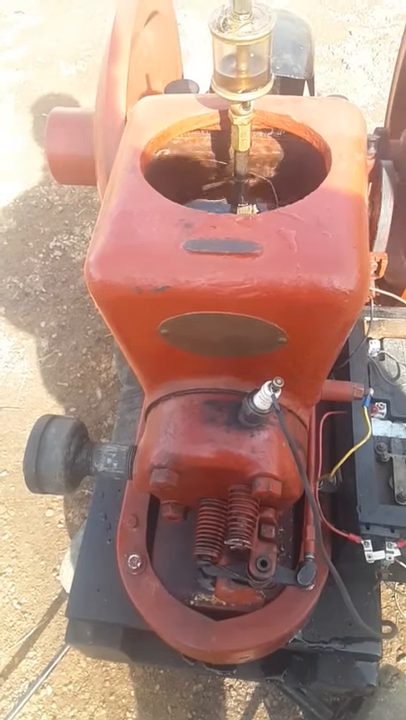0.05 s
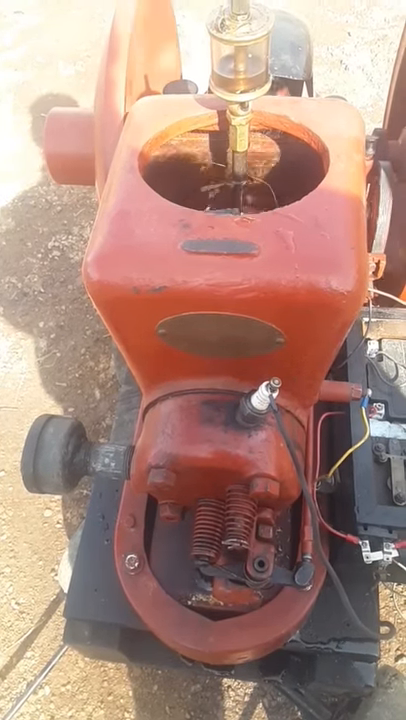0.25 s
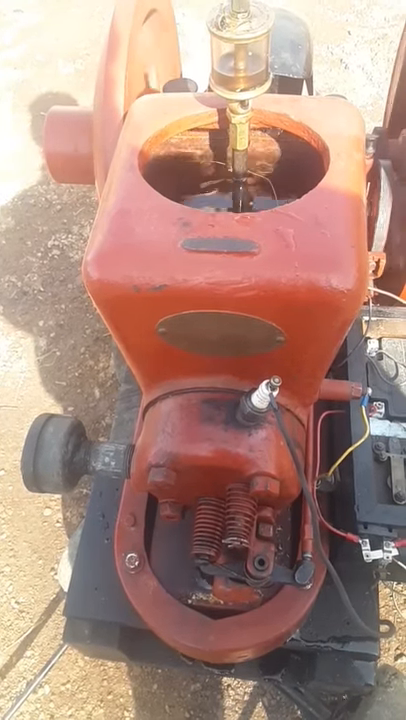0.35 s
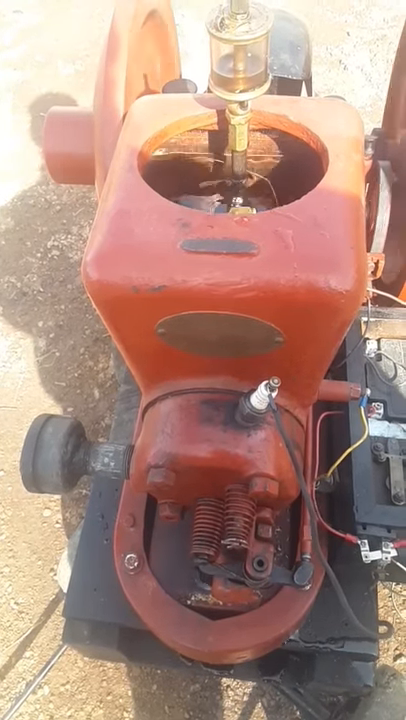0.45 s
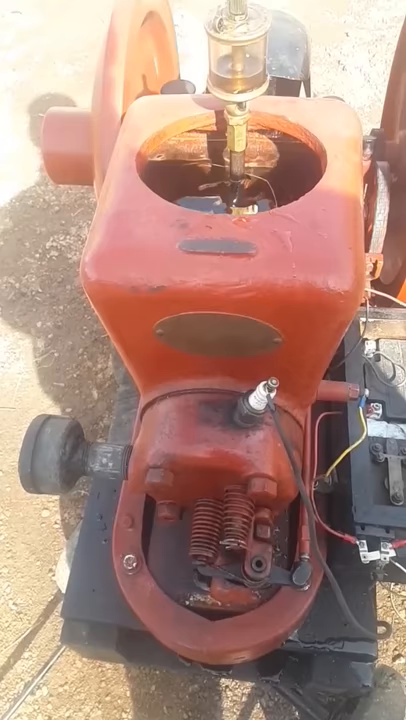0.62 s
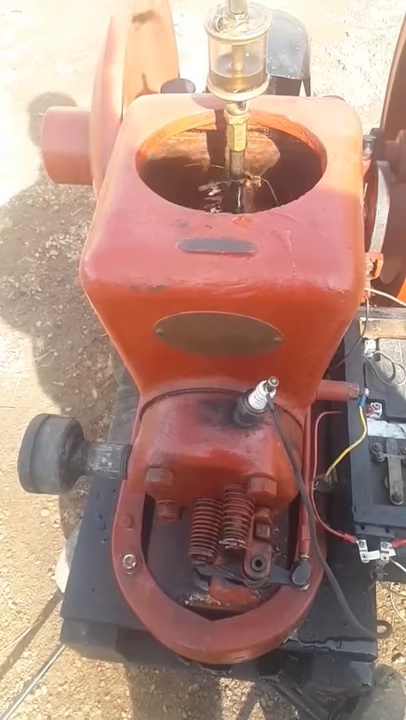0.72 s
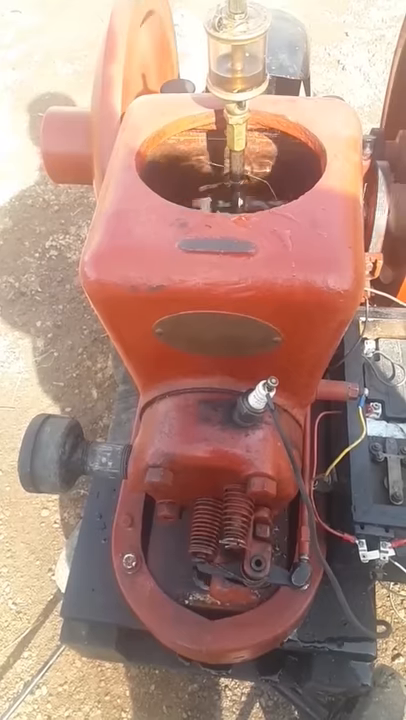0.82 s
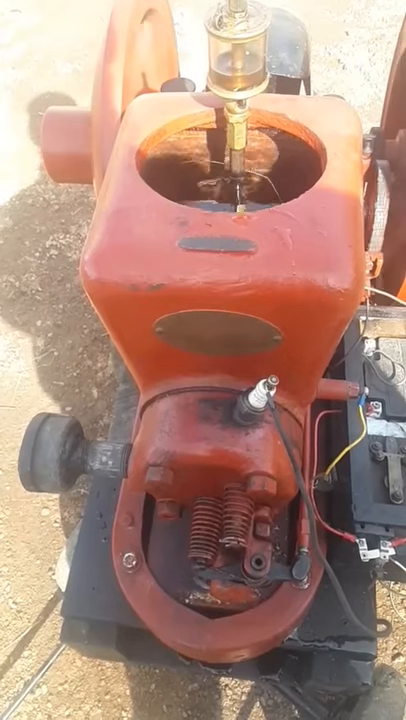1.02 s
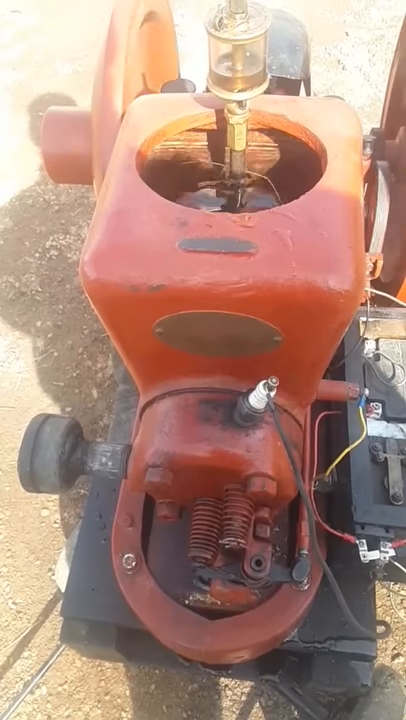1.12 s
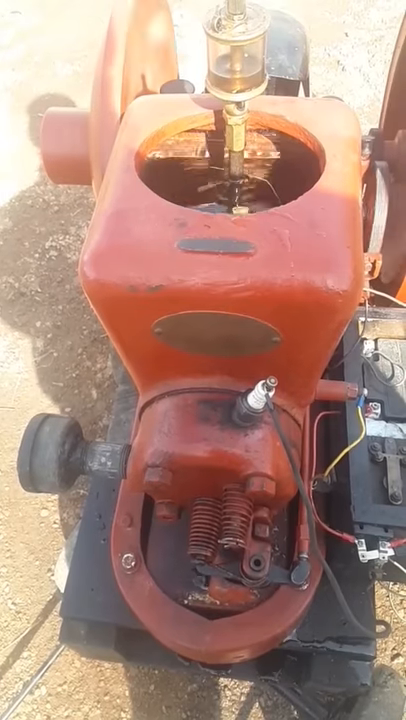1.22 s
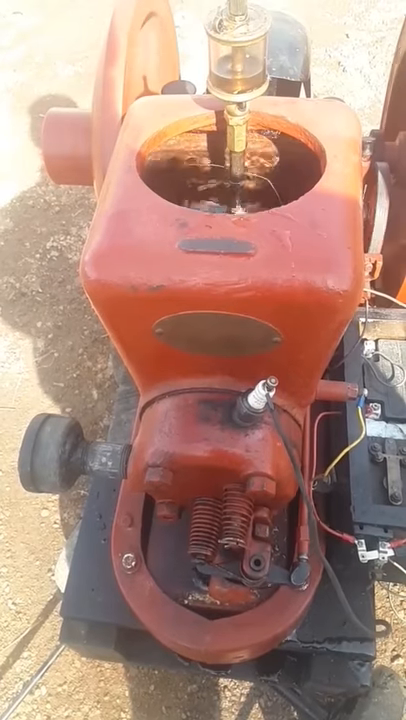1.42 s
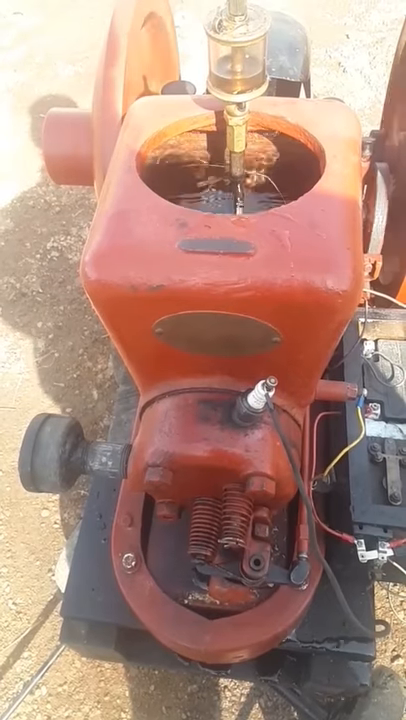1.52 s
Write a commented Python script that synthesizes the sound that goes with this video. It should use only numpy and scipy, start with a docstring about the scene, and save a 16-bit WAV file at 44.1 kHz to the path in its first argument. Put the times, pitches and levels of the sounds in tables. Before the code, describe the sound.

Heard from just above it outdoors, an old single-cylinder engine idles with uneven metallic clacks over a low rumble. A quick sputtering intake leads to one strong firing burst and a puff of exhaust before the coasting clatter resumes.

```python
"""Hit-and-miss engine idling.

An old petrol engine outdoors, heard from just above its cylinder head. It coasts with grinding,
rattling gears and a clacking push rod, sucks in a charge through its fluttering intake valve,
fires with a knock, barks from the exhaust and coasts on. Knocks and gear teeth ring the iron casting."""
import sys
import numpy as np
from scipy import signal
from scipy.fft import rfft, irfft
from scipy.io import wavfile

SR = 44100
rng = np.random.default_rng(int(sys.argv[2]) if len(sys.argv) > 2 else 0)


def output_pcm(signal):
    """Save a mono or channel-first signal as 16-bit PCM at the path in sys.argv[1].

    Samples are clipped to [-1, 1] before scaling.
    """
    pcm = np.clip(np.atleast_2d(signal).T, -1, 1) * 32767
    wavfile.write(sys.argv[1], SR, np.round(pcm).astype(np.int16))


N = 68355
T = np.arange(N) / SR

# gear grind and cart rumble: time_s, grind_db, rumble_db
RUNNING_LEVELS = [(0, -32, -40), (.1, -34.5, -37), (.27, -33, -43), (.36, -29, -31), (.42, -36, -45),
                  (.62, -30, -33), (.66, -34, -38), (.71, -29.5, -37), (.81, -37, -40), (.86, -29, -31),
                  (1.0, -31, -27), (1.25, -31, -35), (1.34, -30, -29), (1.4, -36.5, -42)]
# gear, bearing and combustion knocks: start_s, level_db, decay_s
KNOCKS = [(.0605, -19.5, .003), (.0665, -22, .005), (.118, -28, .018), (.1465, -23.5, .006),
          (.209, -26, .01), (.243, -20, .007), (.267, -22, .02), (.315, -23, .01), (.357, -23, .014),
          (.421, -25, .02), (.474, -24.5, .012), (.521, -26, .01), (.5685, -15.5, .005), (.598, -25, .018),
          (.682, -27, .022), (.7155, -19, .006), (.766, -26, .014), (.8315, -13, .0065), (.902, -19, .003),
          (.93, -21, .025), (1.107, -18.5, .01), (1.251, -23, .012), (1.28, -23, .008), (1.315, -25, .02),
          (1.4222, -28, .005)]
# push rod and latch: start_s, tick_db, thud_db
CLACKS = [(.1685, -27.5, -24), (.2245, -34, -23), (.4895, -27, -22), (.5485, -31, -27), (.7143, -33, -34),
          (.828, -28, -22), (.911, -33, -34), (1.1285, -28, -29), (1.4212, -34, -28), (1.4681, -40, -37)]
# intake valve closures: time_s, thump_db, reopening_hiss_db
VALVE_SLAPS = [(.9245, -21, -14.5), (.9465, -19, -12.5), (.9700, -9.5, -13), (.9918, -6.5, -19),
               (1.0102, -7, -36)]
# cylinder jolts, firing noises, exhaust puffs: start_s, level_db, rise_s, hold_s, decay_s
JOLTS = [(.9015, -17, .001, .004, .005), (1.1055, -14, .004, .009, .004)]
FIRING_HISS = (1.083, -24.5, .012, .002, .009)
FIRING_SCRAPE = (1.094, -25, .003, .02, .006)
BARK = (1.1615, -7, .004, .008, .004)
BLOWDOWN = [(1.175, -22, .003, .055, .025), (1.205, -17.5, .008, .005, .01)]
BOOM = (1.1785, -6.5, .008, .016, .0065)
# brief dropout: time_s, gain_db
DROPOUT = [(.008, 0), (.024, -60), (.039, -60), (.042, -10), (.048, 0)]

# iron casting: pitch_hz, relative_db, t60_s
IRON_MODES = [(460, -20, .15), (965, -14, .12), (1420, -8, .05), (1800, -2, .035), (1866, 0, .07),
              (2050, -4, .06), (2335, -11, .06), (2555, -12, .04), (2880, -17, .1), (3430, -16, .07),
              (3965, -16, .08), (5160, -23, .07)]
# valve springs, cylinder, exhaust port: pitch_hz, relative_db
SPRING_MODES = [(3980, 0), (5110, -1), (6160, -7)]
CYLINDER_MODES = [(650, -10), (1873, 4), (2525, -8)]
PORT_MODES = [(2180, -5), (2515, -1), (2676, 0), (2943, 0), (3450, -6), (4890, -6)]

# source spectra: frequency_hz, relative_db
GRIND_SPECTRUM = [(150, -14), (280, -3), (380, -9), (470, -2), (700, 0), (1050, -6), (1400, -2), (1950, -1),
                  (3100, -14), (4000, -14), (7000, -32), (8500, -44), (17000, -45)]
RUMBLE_SPECTRUM = [(20, -32), (75, -2), (170, 0), (280, -1), (380, -18), (3000, -60)]
KNOCK_SPECTRUM = [(100, -23), (1000, -12), (1680, -8), (1900, 2), (2100, -3), (2400, -5), (3100, -16),
                  (4000, -17), (6300, -34), (8200, -53), (16000, -56)]
TICK_SPECTRUM = [(300, -10), (1500, -4), (5200, 0), (6800, -8), (8300, -25), (17000, -31)]
THUD_SPECTRUM = [(60, -34), (270, 5), (380, -9), (470, 3), (600, -3), (720, -1), (5000, -52)]
INTAKE_SPECTRUM = [(300, -22), (1600, -9), (2100, -2), (3400, -8), (3800, 3), (4400, -3), (6300, -2),
                   (7400, -9), (8250, -23), (9900, -9), (17000, -13)]
BARK_SPECTRUM = [(330, -2), (600, -9), (1150, 0), (1500, -7), (2000, 6), (2700, -4), (5000, -8),
                 (6500, -15), (8100, -32), (10400, -18), (17000, -21)]
BLOWDOWN_SPECTRUM = [(200, -9), (1500, -5), (3500, -1), (6400, -13), (7900, -35), (10500, -23),
                     (17000, -26)]


def amp(level_db):
    """Decibels to gain."""
    return 10 ** (np.asarray(level_db) / 20)


def unit_rms(x):
    """Scale to rms 1."""
    return x / np.sqrt(np.mean(x ** 2))


def noise():
    """White noise."""
    return rng.standard_normal(N)


def convolve(x, response):
    """Pass x through a response scaled to unit energy."""
    return signal.fftconvolve(x, response / np.linalg.norm(response))[:N]


def colour(x, spectrum, taps=4096):
    """Minimum-phase filter with the shape of a spectrum."""
    frequency_hz, relative_db = np.array(spectrum).T
    grid_hz = np.maximum(np.arange(taps // 2 + 1) * SR / taps, 1)
    grid_db = np.interp(np.log(grid_hz), np.log(frequency_hz), relative_db)
    cepstrum = irfft(np.log(amp(grid_db)))
    cepstrum[1:taps // 2] *= 2
    cepstrum[taps // 2 + 1:] = 0
    return convolve(x, irfft(np.exp(rfft(cepstrum))))


def ring(x, modes):
    """Drive damped modes of alternating sign with x."""
    age_s = T[:N // 4]
    response = np.zeros_like(age_s)
    for k, (pitch_hz, relative_db, t60_s) in enumerate(modes):
        envelope = amp(relative_db) / np.sqrt(t60_s) * np.exp(-np.log(1000) * age_s / t60_s)
        response += (-1) ** k * envelope * np.sin(2 * np.pi * pitch_hz * age_s)
    return convolve(x, response)


def swell(start_s, level_db, rise_s, hold_s, decay_s):
    """Linear rise, hold, exponential decay."""
    age_s = T - start_s
    attack = np.clip(age_s / rise_s, 0, 1)
    return amp(level_db) * attack * np.exp(-np.maximum(age_s - rise_s - hold_s, 0) / decay_s)


def wavelet(centre_s, level_db, pitch_hz, width_s):
    """One short swing of air pressure."""
    age_s = T - centre_s
    return amp(level_db) * np.sin(2 * np.pi * pitch_hz * age_s) * np.exp(-(age_s / width_s) ** 2 / 2)


def contacts(rate_per_s=1100, spread_db=2.4):
    """Dense small metal contacts of uneven size."""
    hits = rng.random(N) < rate_per_s / SR
    return unit_rms(hits * np.sign(noise()) * amp(spread_db * noise()))


def gears_and_cart(ring_db=-4.5):
    """Gear teeth grind without pause and ring the casting; the cart rumbles."""
    time_s, grind_db, rumble_db = np.array(RUNNING_LEVELS).T
    teeth = unit_rms(contacts() + .7 * noise()) * amp(np.interp(T, time_s, grind_db))
    rumble = unit_rms(colour(noise(), RUMBLE_SPECTRUM)) * amp(np.interp(T, time_s, rumble_db))
    return colour(teeth, GRIND_SPECTRUM) + amp(ring_db) * ring(teeth, IRON_MODES) + rumble


def knocks(strike_db=17, ring_db=-.5):
    """Slack gears, bearings and combustion strike the casting once, then rattle on."""
    force = np.zeros(N)
    for start_s, level_db, decay_s in KNOCKS:
        envelope = swell(start_s, level_db, rise_s=.22 * decay_s, hold_s=0, decay_s=decay_s)
        rattle = envelope * (contacts() + noise())
        force += rattle * np.linalg.norm(envelope) / np.linalg.norm(rattle)
        force[int(start_s * SR)] += amp(level_db + strike_db)
    return colour(force, KNOCK_SPECTRUM) + amp(ring_db) * ring(force, IRON_MODES)


def spring_twang(start_s, level_db, top_hz=5900, fall_s=.011):
    """Treble runs along the coils first, so the pitch falls."""
    cycles = top_hz * fall_s * np.exp(-np.maximum(T - start_s, 0) / fall_s)
    return swell(start_s, level_db, rise_s=.0014, hold_s=0, decay_s=.007) * np.sin(2 * np.pi * cycles)


def push_rod(spring_db=-5, spring_t60_s=.03, twang_db=-4, thud_lag_s=.002):
    """The rod ticks, the valve springs ring and twang, the frame answers with a thud."""
    tick_envelope, thud_envelope, twangs = np.zeros((3, N))
    for start_s, tick_db, thud_db in CLACKS:
        tick_envelope += swell(start_s, tick_db, rise_s=.0014, hold_s=.0014, decay_s=.0042)
        thud_envelope += swell(start_s + thud_lag_s, thud_db, rise_s=.005, hold_s=0, decay_s=.024)
        twangs += spring_twang(start_s, tick_db + twang_db)
    ticks = tick_envelope * noise()
    springs = amp(spring_db) * ring(ticks, [(hz, db, spring_t60_s) for hz, db in SPRING_MODES])
    thuds = colour(thud_envelope * noise(), THUD_SPECTRUM)
    return colour(ticks, TICK_SPECTRUM) + springs + twangs + thuds


def cylinder_pings():
    """Hard jolts ping the cylinder before the intake and at combustion."""
    tone = sum(amp(db) * np.sin(2 * np.pi * hz * T) for hz, db in CYLINDER_MODES)
    return sum(swell(*jolt) for jolt in JOLTS) * tone


def intake(reopen_lag_s=.002, pipe_lag_s=.007, pipe_hz=290):
    """Air hisses through the fluttering valve; each closure thumps, the pipe rings after the last."""
    flow, thumps = np.zeros((2, N))
    for shut_s, thump_db, hiss_db in VALVE_SLAPS:
        flow += swell(shut_s + reopen_lag_s, hiss_db, rise_s=.003, hold_s=.0142, decay_s=.003)
        thumps += wavelet(shut_s, thump_db, pitch_hz=260, width_s=.0019)
    pipe_start_s = VALVE_SLAPS[-1][0] + pipe_lag_s
    pipe_envelope = swell(pipe_start_s, level_db=-16.5, rise_s=.004, hold_s=0, decay_s=.016)
    pipe = pipe_envelope * np.sin(2 * np.pi * pipe_hz * (T - pipe_start_s))
    return colour(flow * noise(), INTAKE_SPECTRUM) + thumps + pipe


def firing():
    """A short hiss and a metallic scrape as the charge fires."""
    hiss = colour(swell(*FIRING_HISS) * noise(), INTAKE_SPECTRUM)
    scrape = colour(swell(*FIRING_SCRAPE) * noise(), TICK_SPECTRUM)
    return hiss + scrape


def exhaust(boom_start_hz=125, glide_hz_per_s=2800, port_db=-3.5, port_t60_s=.08):
    """The valve barks open, the pipe booms upward in pitch, spent gas hisses out and rings the port."""
    pressure_front = -wavelet(centre_s=1.1607, level_db=-11, pitch_hz=320, width_s=.0013)
    bark = swell(*BARK) * noise()
    gas = sum(swell(*puff) for puff in BLOWDOWN) * noise()
    age_s = T - BOOM[0]
    boom_cycles = boom_start_hz * age_s + glide_hz_per_s * age_s ** 2 / 2
    boom = swell(*BOOM) * np.sin(2 * np.pi * boom_cycles)
    port = amp(port_db) * ring(gas + .5 * bark, [(hz, db, port_t60_s) for hz, db in PORT_MODES])
    return pressure_front + colour(bark, BARK_SPECTRUM) + colour(gas, BLOWDOWN_SPECTRUM) + boom + port


def scene(scatter_db=-21):
    """The engine with a faint outdoor scatter, mono."""
    engine = gears_and_cart() + knocks() + push_rod() + cylinder_pings() + intake() + firing() + exhaust()
    yard_response = noise() * swell(start_s=.004, level_db=0, rise_s=.003, hold_s=0, decay_s=.022)
    return (engine + amp(scatter_db) * convolve(engine, yard_response))[None]


def record(dry, low_cut_hz=48, high_cut_hz=17000):
    """The microphone thins the deep bass; the sound drops out once, peaks clip, the top is cut."""
    thinned = signal.sosfilt(signal.butter(2, low_cut_hz, "high", fs=SR, output="sos"), dry)
    time_s, gain_db = np.array(DROPOUT).T
    clipped = np.clip(thinned * amp(np.interp(T, time_s, gain_db)), -1, 1)
    return signal.sosfilt(signal.ellip(8, .2, 60, high_cut_hz, fs=SR, output="sos"), clipped)


dry = scene()
out = record(dry)
output_pcm(out)
```